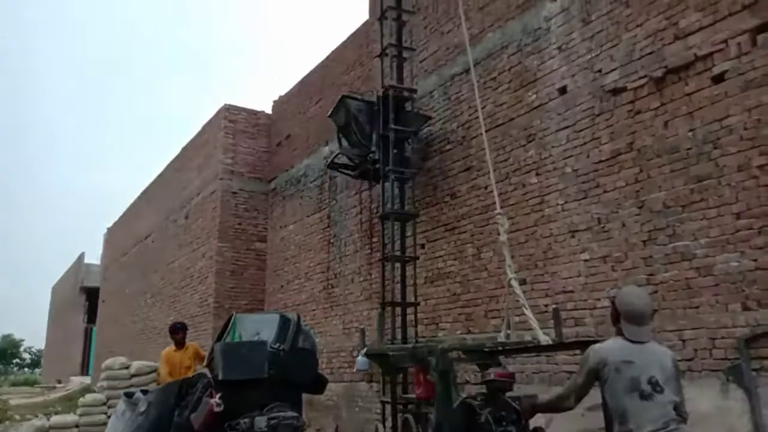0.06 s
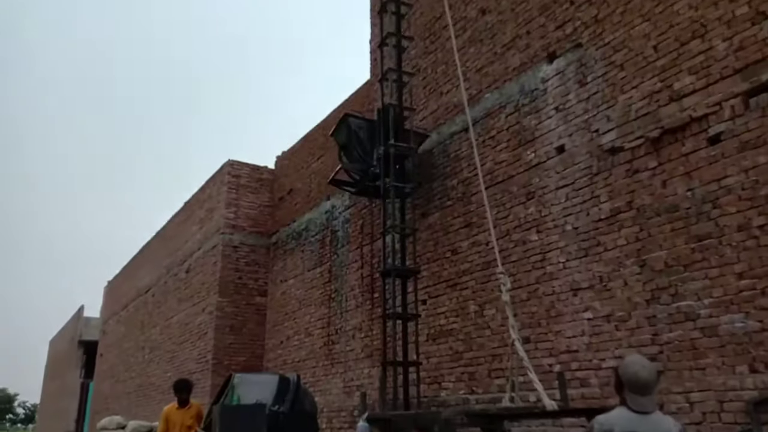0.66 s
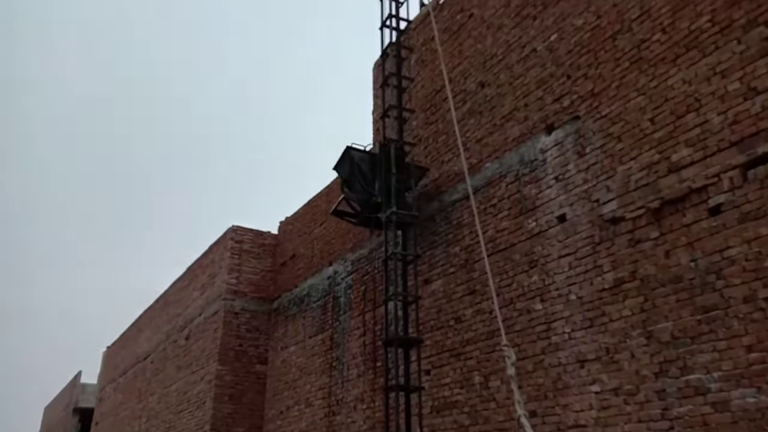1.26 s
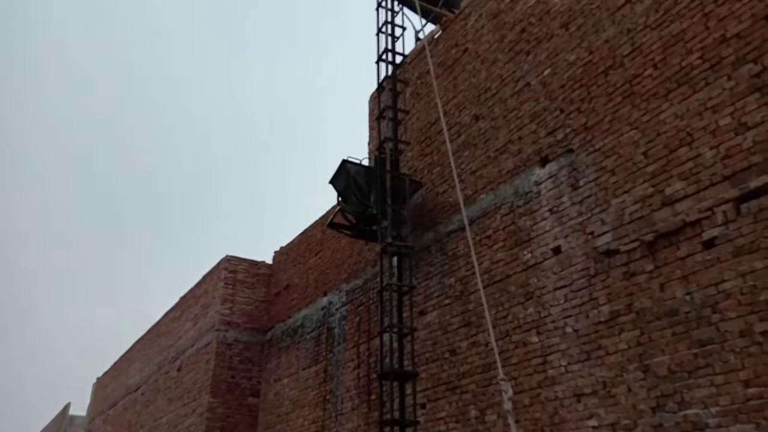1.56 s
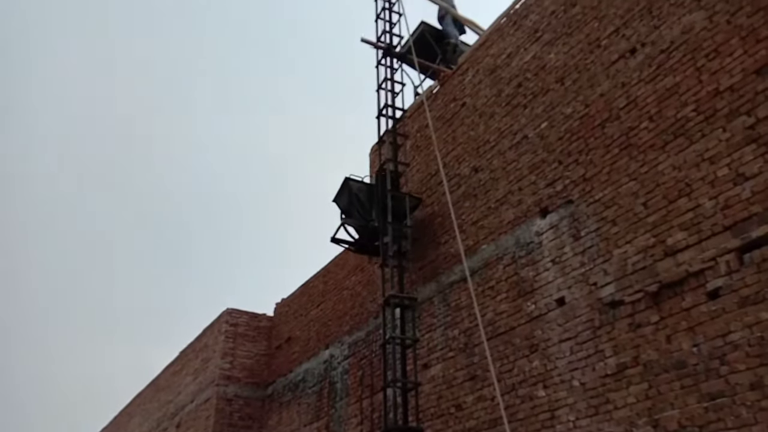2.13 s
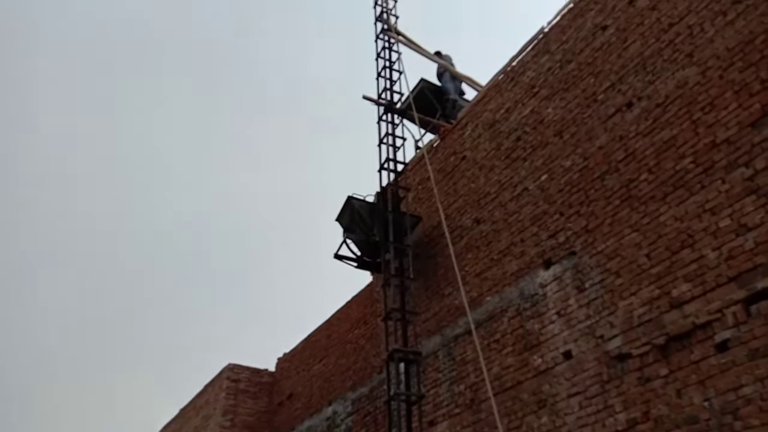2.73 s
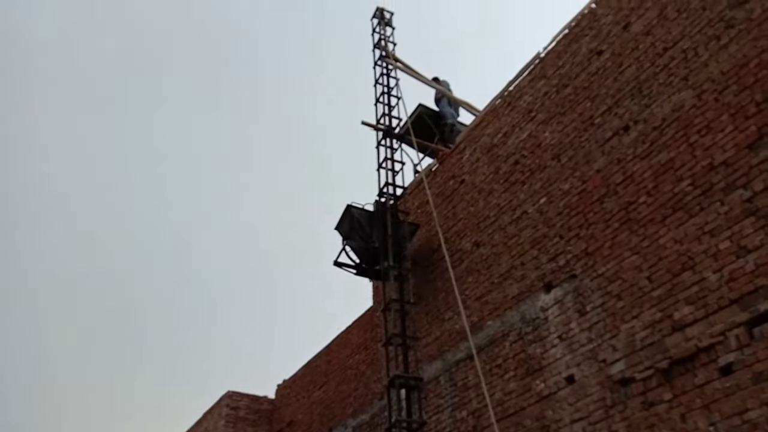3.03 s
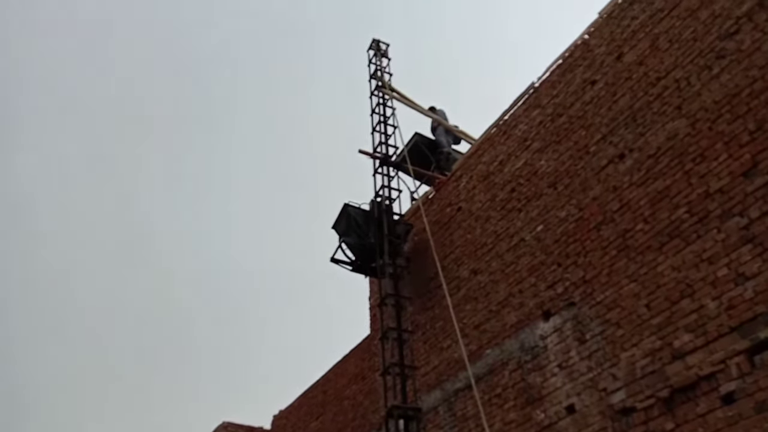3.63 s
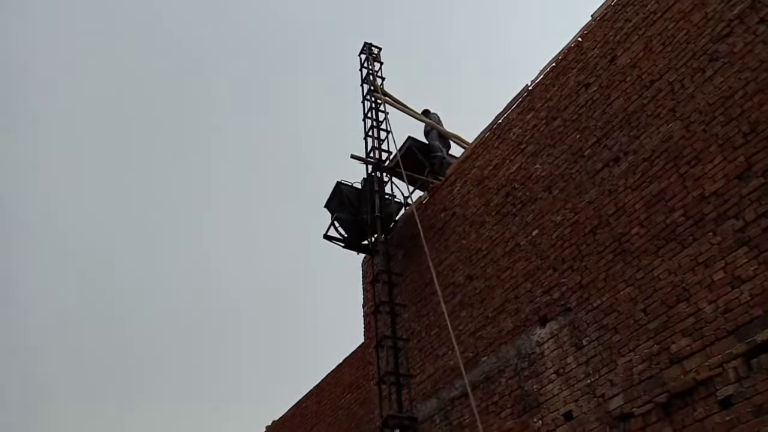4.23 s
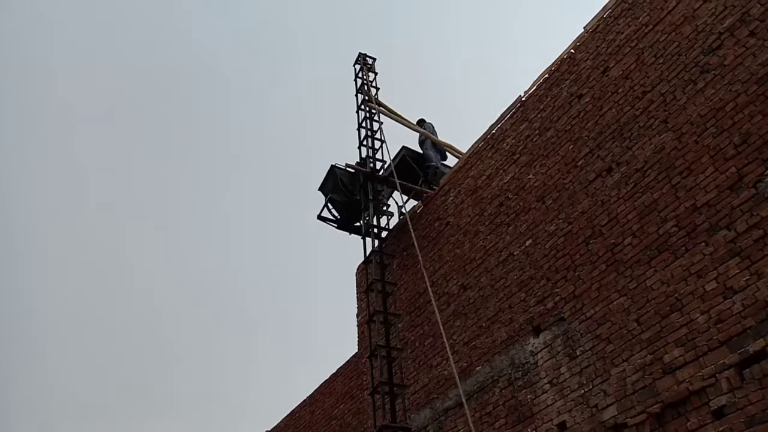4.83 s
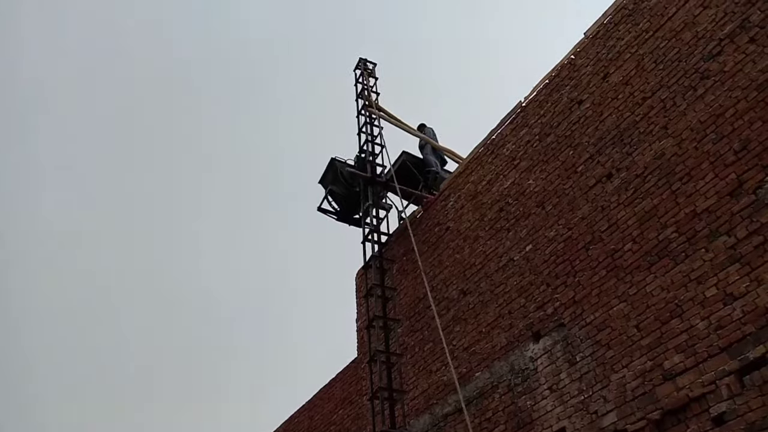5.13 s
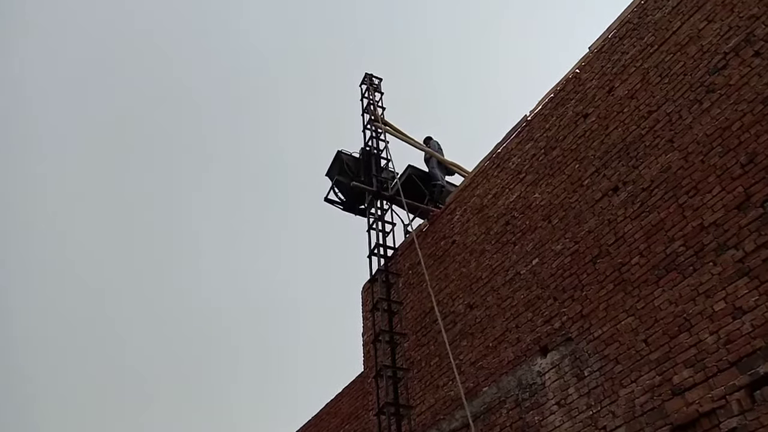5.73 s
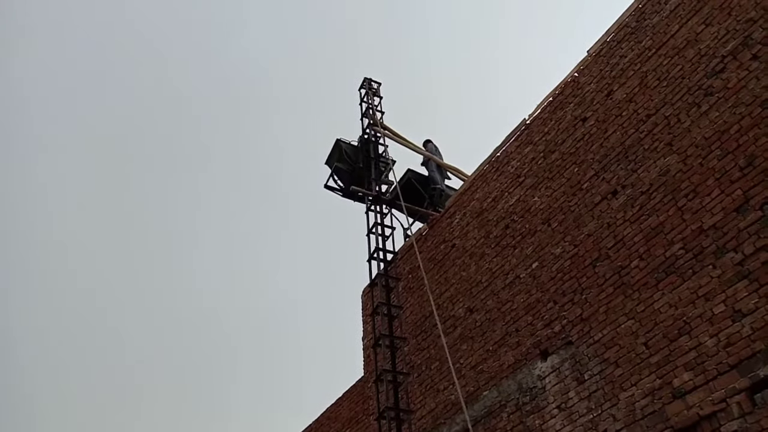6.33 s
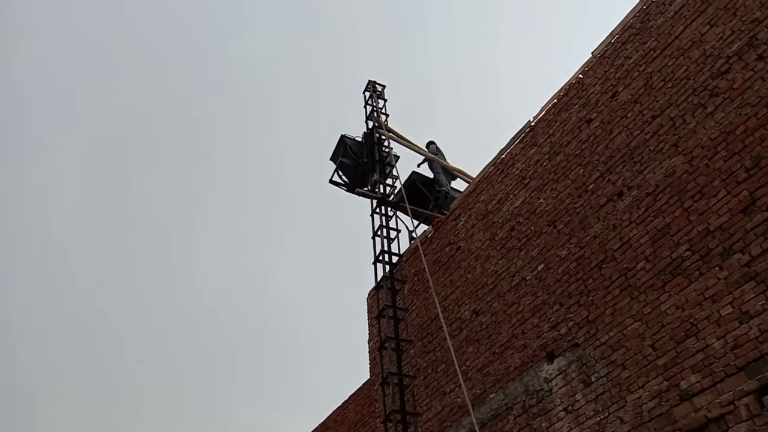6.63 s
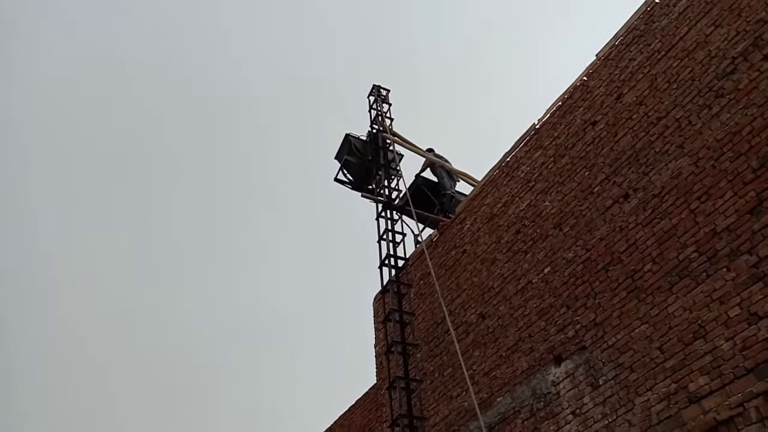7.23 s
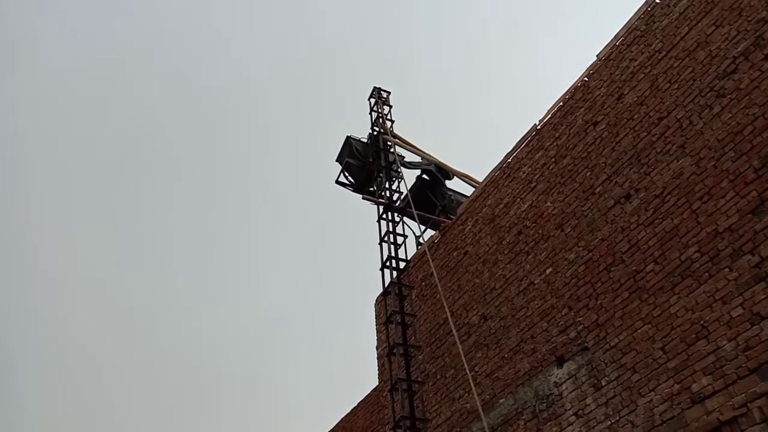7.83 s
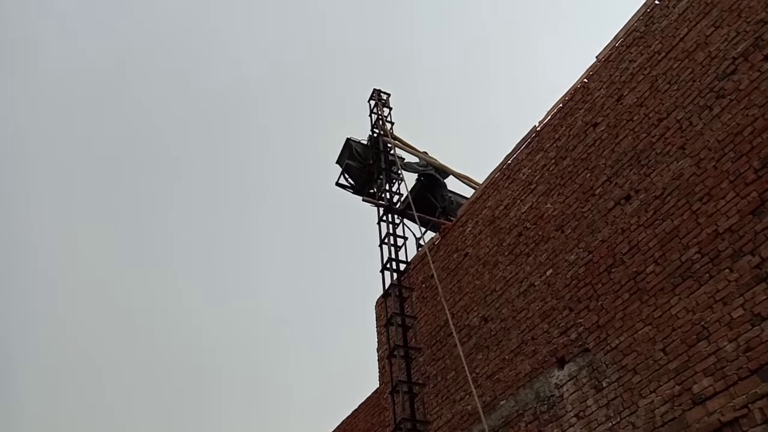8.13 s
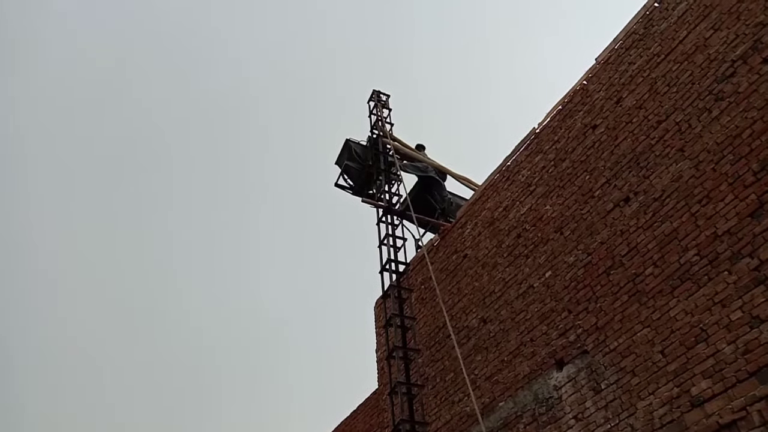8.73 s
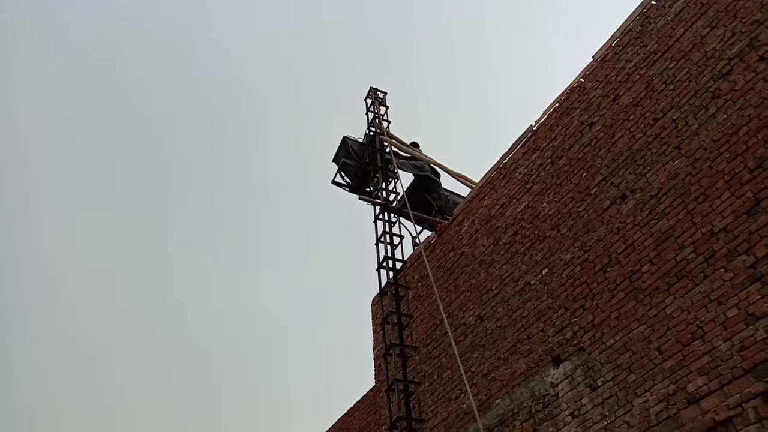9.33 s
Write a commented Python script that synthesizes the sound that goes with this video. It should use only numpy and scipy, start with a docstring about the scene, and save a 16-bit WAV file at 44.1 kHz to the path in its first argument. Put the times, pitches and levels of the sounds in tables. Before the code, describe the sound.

From the start, a single-cylinder diesel runs close to the microphone, driving a concrete mixer and hoist at an outdoor building site. It knocks hard and evenly, about thirteen beats a second, each with an exhaust puff, a ring of pipe and a metallic rattle. Over the first four seconds the knock softens slightly as the microphone tilts away. At about 5.6 seconds the throttle shuts and the sharp knock stops abruptly. The engine coasts on in booming puffs, valve clicks and gear clatter, slowing to about half speed by 8 seconds. Around 8.8 to 9.1 seconds it fires three lighter knocks at idle. A second diesel farther back, mostly buried at first, emerges after the cut with a steady, hollow chug until the end at about 9.4 seconds. The mixer drum rumbles faintly throughout, and a brick wall adds short, dull echoes.

```python
"""The hard, fast knock of a single-cylinder diesel, close up, driving a concrete mixer and hoist beside
a brick wall. Each cycle is a combustion knock, an exhaust puff that rings silencer and pipe, and a rattle
of valve gear. The microphone slowly tilts up and away. When the throttle is shut the knock stops, the
flywheel coasts down to idle and the engine fires a few times more. Farther back a second diesel chugs
steadily, over the low rumble of the drum."""
import sys
import numpy as np
from scipy import signal
from scipy.fft import rfft, irfft, next_fast_len
from scipy.io import wavfile
from scipy.ndimage import uniform_filter1d, minimum_filter1d

SR = 44100
rng = np.random.default_rng(int(sys.argv[2]) if len(sys.argv) > 2 else 0)


def pcm_store(signal):
    """Save signal as 16-bit PCM."""
    levels = np.round(np.clip(np.atleast_2d(signal), -1, 1) * 32767)
    wavfile.write(sys.argv[1], SR, levels.astype(np.int16).T)


N = 413216
TIME = np.arange(N) / SR
THROTTLE_SHUT_S = 5.58
MIC_TILT = np.minimum(TIME / 4.3, 1)  # 0 aimed at the near engine, 1 tilted up and away

# Pace of the near engine. Each row: time in seconds, cycles per second.
SPEED = [(0, 13.284), (0.8, 13.311), (1.7, 13.474), (2.6, 13.37), (3.6, 13.321), (4.5, 13.074),
         (5.5, 12.862), (6, 11.259), (6.5, 9.368), (7, 7.727), (7.5, 7.218), (8.2, 6.449), (8.7, 5.943),
         (8.95, 6.225), (9.37, 6.302)]
# Its drifting tone. Each row: time in seconds, the knock's ring in Hz, then sizzle, rattle and pipe in dB.
COLOUR = [(.45, 1460, -8, -4, 5), (1.25, 2480, 4.5, 1, 0.5), (1.8, 2070, -7, -1.5, -1.5),
          (2.5, 2480, 2, 1, -1.5), (3.7, 2520, -8.5, -0.5, 3), (4.7, 2570, -3.5, -0.5, 2),
          (5.6, 2300, -7, -1, 0)]


def near_engine():
    """The diesel at the microphone: knock, exhaust, valve and gears all follow one crank."""
    puff_place = .663  # places are fractions of a cycle
    return knock(puff_place) + exhaust(puff_place) + pipe(puff_place) + valve(puff_place) + gears(puff_place)


def knock(puff_place):
    """Fuel ignites a third of a cycle before the puff, shaking the block and thumping the crankcase."""
    # The block's spectrum. Each row: frequency in Hz, level in dB.
    block_spectrum = [(200, 13), (550, 2.5), (1000, -3.5), (1600, 4.5), (2200, 2.5), (2800, 2),
                      (3500, -5.5), (4200, -14.5), (5500, -2.5), (6900, -17.5), (8000, -27), (9800, -16),
                      (13300, -25), (15000, -15.5)]
    # Crankcase modes. Each row: delay in ms, pitch in Hz, level in dB, rise in ms, t60 in ms.
    crankcase_modes = [(0, 500, -21, 1.5, 25), (0, 766, -18, 1.2, 24)]
    # Firings at idle. Each row: start in seconds, level in dB.
    idle_firings = [(8.754, -11), (8.916, -10), (9.076, -11.5)]
    times = moments(SPEED, puff_place - .328)
    times = times[times < THROTTLE_SHUT_S]
    gains = scatter(times, spread_db=.6)
    ring_hz, sizzle_db, _, _ = curves(COLOUR)
    block = noise(block_spectrum, patchy_db=3, low_hz=442, ring_hz=ring_hz, ring_db=6.5)
    crack = highpass(block, 3300, 8)
    sizzle = highpass(block, 11000, 12)
    treble = amp(.13 * sizzle_db) * (crack - sizzle) + amp(sizzle_db) * sizzle
    blows = (block - crack) * burst(times, gains, 2.06, 6.65) + treble * burst(times, gains, 1.23, 6.4)
    shell = lowpass(highpass(block, 1400, 6), 6500, 2)
    shaking = shell * burst(times, amp(-11.5) * gains, rise_ms=13, length_ms=20.2)
    thump = chug(times, crankcase_modes, spread_db=5, detune=.08)
    idle_s, idle_db = np.transpose(idle_firings)
    idling = block * burst(idle_s, amp(idle_db), rise_ms=.9, length_ms=8)
    # Tilting up, the microphone loses 1 dB of knock and gains 1 dB of thump.
    return amp(-MIC_TILT) * (blows + shaking) + amp(MIC_TILT - 1) * thump + idling


def exhaust(puff_place):
    """Each puff strikes silencer and frame; the weak pulse of the unfired cylinder sloshes and booms."""
    # Modes of the strike and the slosh. Each row: delay in ms, pitch in Hz, level in dB, rise and t60 in ms.
    silencer_modes = [(-26.5, 92.6, -17.5, 2.6, 122), (-8, 152, -21, 7.4, 92), (-4, 289.5, -1.5, 4.1, 23.2),
                      (-3.5, 248, -20, 2, 106), (-2, 400, -14.5, 1.6, 24.7), (-1, 750, -26, 0.81, 15),
                      (-4.5, 900, -20, 1.1, 46), (-27, 240, -14, 3, 15), (10, 268, -13.5, 6.4, 34)]
    slosh_modes = [(-1, 207, 2, 2.2, 36), (-33, 137, -15, 7.3, 80), (26, 156, -8, 8.9, 170),
                   (10, 240, -15, 8.7, 73), (-8.5, 93, -5.5, 7.4, 120)]
    puffs = moments(SPEED, puff_place)
    thud = strength("exhaust") * chug(puffs, silencer_modes, spread_db=1.03, detune=.0034)
    boom = strength("boom") * chug(puffs, slosh_modes, spread_db=0, detune=.02)
    return thud + boom


def pipe(puff_place):
    """Gas pulses ring the exhaust pipe; the rushing gas keeps it singing faintly in between."""
    # The valve cracking open, the puff, its rebound. Each row: offset from the puff in cycles, level in dB.
    gas_pulses = [(-.09, -6), (0, 1), (.31, -7.5)]
    cold_hz, hot_hz = 1042, 1239 + 8 * TIME  # the note climbs as the gas heats and drops without fire
    note_hz = cold_hz + pulling() * (hot_hz - cold_hz)
    struck = 0
    for offset, db in gas_pulses:
        times = moments(SPEED, puff_place + offset)
        hz = np.interp(times, TIME, note_hz) * (1 + .0077 * rng.standard_normal(len(times)))
        struck += rings(times - .0022, amp(db - 16) * scatter(times, .8), hz, rise_ms=1.54, t60_ms=29)
    flutter = [unit(lowpass(rng.standard_normal(N), 30, 2)) for _ in range(2)]
    angle = 2 * np.pi * np.cumsum(note_hz) / SR
    singing = flutter[0] * np.cos(angle) + flutter[1] * np.sin(angle)
    _, _, _, pipe_db = curves(COLOUR)
    return amp(pipe_db) * (strength("pipe") * struck + strength("gas") * singing)


def valve(puff_place):
    """A scrape leads into the snap of the exhaust valve, which later clicks shut."""
    # The valve's spectrum. Each row: frequency in Hz, level in dB.
    valve_spectrum = [(200, 4), (550, -26), (1000, -7.5), (1600, -13), (2200, -6.5), (2800, -7),
                      (3500, -18.5), (4200, -20.5), (5500, -10), (6900, -18), (8000, -32.5), (9800, -22.5),
                      (13300, -36.5), (15000, -31)]
    puffs, seatings = moments(SPEED, puff_place), moments(SPEED, puff_place + .265)
    snap = burst(puffs - .0028, amp(-13) * scatter(puffs, .84), .47, 6.14)
    scrape = burst(puffs - .014, amp(-15) * scatter(puffs, .84), 3, 6)
    click = burst(seatings - .003, amp(-20.5) * scatter(seatings, 1.3), .73, 3.6)
    return strength("valve") * (snap + scrape + click) * noise(valve_spectrum, patchy_db=1, low_hz=233)


def gears(puff_place):
    """Tappets, gears and piston clack in step with the crank; loose parts tick at random."""
    # Clacks. Each row: offset from the puff in cycles, dB pulling, dB coasting, length in ms.
    loose_contacts = [(-.13, -15, -16, 9.8), (0.289, -16, -28, 9.4), (0.428, -13, -16, 5.5),
                      (0.554, -16.5, -19, 4.2), (.6, -38, -19.5, 22)]
    # The gears' spectrum. Each row: frequency in Hz, level in dB.
    gear_spectrum = [(200, -11.5), (550, -11.5), (1000, -5), (1600, -3.5), (2200, -1.5), (2800, -1.5),
                     (3500, -13.5), (4200, -21.5), (5500, -12.5), (6900, -26), (8000, -37.5), (9800, -28),
                     (13300, -40.5), (15000, -36)]
    contacts = [(offset, coast_db + (pull_db - coast_db) * pulling(), ms)
                for offset, pull_db, coast_db, ms in loose_contacts]
    clacks = strength("gears") * rattle(SPEED, puff_place, contacts, spread_db=.77, steady_db=-25)
    ticks = TIME[rng.random(N) < 67 / SR]  # about 67 a second
    chatter = amp(-23.5 - 4.8 * pulling()) * burst(ticks, .95, rise_ms=.26, length_ms=1.5)
    _, _, rattle_db, _ = curves(COLOUR)
    return amp(rattle_db) * np.hypot(clacks, chatter) * noise(gear_spectrum, patchy_db=2.5, low_hz=141)


def whine():
    """The frame hums and the gears whine, locked to the crank and fading when the load goes."""
    # Each row: multiple of the cycle rate, level in dB.
    crank_tones = [(7, -44), (11, -39), (23, -37), (29, -36), (67, -39), (68, -36), (84, -49)]
    angle = 2 * np.pi * np.cumsum(curves(SPEED)[0]) / SR
    tones = sum(amp(db) * np.sin(order * angle + rng.uniform(0, 2 * np.pi)) for order, db in crank_tones)
    return strength("hum") * tones


def far_engine():
    """A second diesel keeps its pace farther back; its hollow exhaust note falls within each puff."""
    # Each row: time in seconds, cycles per second.
    far_speed = [(6, 11.634), (7.8, 11.582), (9.37, 11.753)]
    # How much it stands out: buried under the knock, coming forward once the knock stops.
    # Each row: time in seconds, level in dB.
    prominence = [(0, -4.5), (4.2, -15.5), (5.5, -10.5), (5.68, -1), (9.37, 1.5)]
    # Each row: delay in ms, pitch in Hz, level in dB, rise in ms, t60 in ms.
    silencer_modes = [(-26.5, 106, -24.5, 5, 170), (-36.5, 171, -22, 3, 163), (-26, 270, -17.5, 0.94, 12),
                      (-25, 440, -16.5, 0.64, 19.4), (-5.5, 600, 1.5, 1.36, 6), (-15, 1660, -11.5, 5.3, 69)]
    # Clacks. Each row: offset from the puff in cycles, level in dB, length in ms.
    loose_contacts = [(-.17, -21, 4), (.32, -32, 3.8), (.5, -19, 3.6)]
    # The clatter's spectrum. Each row: frequency in Hz, level in dB.
    body_spectrum = [(100, 4.5), (170, 0.5), (400, -2.5), (580, -12), (1250, 1), (1700, -4), (2700, -7),
                     (3500, -21), (4300, -26.5), (5500, -18.5), (8000, -39.5), (9800, -38), (13300, -50),
                     (15000, -43)]
    puff_place = .056
    puffs = moments(far_speed, puff_place)
    thud = chug(puffs, silencer_modes, spread_db=2.3, detune=.011)
    hollow_hz = 992.5 * (1 + .014 * rng.standard_normal(len(puffs)))
    hollow = rings(puffs - .0065, amp(10) * scatter(puffs, 1), hollow_hz, rise_ms=7, t60_ms=20, sag=.29)
    clacks = rattle(far_speed, puff_place, loose_contacts, spread_db=1.5, steady_db=-22.5)
    clatter = clacks * noise(body_spectrum, patchy_db=1.5, low_hz=75.4)
    return amp(curves(prominence)[0]) * (thud + hollow + clatter)


def wall_echoes(x):
    """Brickwork and ground throw back short, dulled echoes."""
    # Each row: delay in ms, gain.
    reflections = [(6.3, 0.11), (14, 0.029), (23.4, 0.063)]
    echoes = filtered(x, lambda hz: sum(g * np.exp(-2j * np.pi * hz * ms / 1000) for ms, g in reflections))
    return lowpass(echoes, 3000, 2)


def yard(x, t60_s, dull_hz):
    """The dull, diffuse answer of the building site."""
    t = np.arange(SR // 3) / SR
    tail = rng.standard_normal(len(t)) * amp(-60 * t / t60_s) * (t > .008)
    return lowpass(signal.oaconvolve(x, tail / np.linalg.norm(tail))[:N], dull_hz, 2)


def drum():
    """The mixer drum rumbles under everything."""
    # Each row: frequency in Hz, level in dB.
    rumble_spectrum = [(25, -47), (45, -66), (70, 2), (100, -5), (200, -3.5), (350, -13), (550, -10.5),
                       (900, -9), (1500, -40), (4000, -65)]
    return amp(-32) * noise(rumble_spectrum, patchy_db=.5, low_hz=13)


def pulling():
    """1 under load, falling to 0 in 76 ms as the throttle is shut."""
    return np.clip((THROTTLE_SHUT_S - TIME) / .076 + .5, 0, 1)


def strength(part):
    """Gain of a part of the near engine, from load, speed and the aim of the microphone."""
    # Each row: dB pulling, dB coasting, dB per halving of speed, dB added at full tilt while pulling.
    part_levels = {"exhaust": (4.5, 1, -8.5, -2.5), "boom": (-39, -9.5, -5.5, -7),
                   "pipe": (6.5, 6.5, -1.5, 0.5), "gas": (-37.5, -28, -17, 5),
                   "valve": (-12.5, 0.5, 0.5, 2.5), "gears": (-1, 0, -2.5, -0.5),
                   "hum": (-0.5, -27, -15, -3)}
    pull_db, coast_db, halving_db, tilt_db = part_levels[part]
    speed, = curves(SPEED)
    load_db = pulling() * (pull_db + tilt_db * MIC_TILT) + (1 - pulling()) * coast_db
    return amp(load_db + halving_db * np.log2(speed[0] / speed))


def moments(speed, place):
    """The times at which the crank passes a place in its cycle."""
    cycles = np.cumsum(curves(speed)[0]) / SR - place
    return np.interp(np.arange(np.ceil(cycles[0]), cycles[-1]), cycles, TIME)


def chug(times, modes, spread_db, detune):
    """Every cycle rings the same modes, a little differently in strength and pitch."""
    total = 0
    for delay_ms, hz, db, rise_ms, t60_ms in modes:
        gains = amp(db) * scatter(times, spread_db)
        pitches = hz * (1 + detune * rng.standard_normal(len(times)))
        total += rings(times + delay_ms / 1000, gains, pitches, rise_ms, t60_ms)
    return total


def rings(times, gains, hz, rise_ms, t60_ms, sag=0):
    """A damped mode that swells in softly at each time, starting sharp by the fraction sag."""
    t = np.arange(SR // 9) / SR
    ms = t * 1000
    shape = (1 - np.exp(-(ms / rise_ms) ** 2)) * amp(-60 * ms / t60_ms)
    warped_s = np.cumsum(1 + sag * np.exp(-t / .006)) / SR
    notes = gains[:, None] * shape * np.sin(2 * np.pi * hz[:, None] * warped_s)
    index = np.round(times * SR).astype(int)[:, None] + np.arange(len(t))
    return np.bincount(np.maximum(index, 0).ravel(), (notes * (index >= 0)).ravel(), N)[:N]


def rattle(speed, puff_place, contacts, spread_db, steady_db):
    """Envelope of contacts tied to the crank, over the steady grinding of gears."""
    power = amp(steady_db) ** 2
    for offset, db, length_ms in contacts:
        times = moments(speed, puff_place + offset)
        times = times - .002 + .0013 * rng.standard_normal(len(times))
        power = power + (amp(db) * burst(times, scatter(times, spread_db), .81, length_ms)) ** 2
    return np.sqrt(power)


def burst(times, gains, rise_ms, length_ms):
    """Envelope of short blows: a quick rise, a moment of ringing, a fast fall."""
    ms = np.arange(SR // 20) / SR * 1000
    shape = (1 - np.exp(-(ms / rise_ms) ** 2)) * np.exp(-(ms / length_ms) ** 2)
    onsets = np.clip(np.round(times * SR).astype(int), 0, N)
    impulses = np.bincount(onsets, gains * (times > 0), N + 1)
    return signal.oaconvolve(impulses, shape)[:N]


def scatter(times, spread_db):
    """A random gain for each blow."""
    return amp(spread_db * rng.standard_normal(len(times)))


def noise(spectrum, patchy_db, low_hz, ring_hz=None, ring_db=0):
    """Noise of rms 1 with a flickering colour, thinned below low_hz, and an optional moving resonance."""
    bin_hz, frame_s, frames = signal.stft(rng.standard_normal(N), SR, nperseg=512)
    patches = uniform_filter1d(rng.standard_normal(frames.shape), size=2, axis=0)
    gain_db = patchy_db * unit(uniform_filter1d(patches, size=7, axis=1))
    if ring_hz is not None:
        gain_db += ring_db * np.exp(-((bin_hz[:, None] - np.interp(frame_s, TIME, ring_hz)) / 330) ** 2)
    patchy = signal.istft(frames * amp(gain_db), nperseg=512)[1][:N]
    knot_hz, knot_db = np.transpose(spectrum)

    def response(hz):
        db = np.interp(np.log(hz + 1), np.log(knot_hz), knot_db)
        return amp(db) * hz ** 2 / (hz ** 2 + low_hz ** 2)
    return unit(filtered(patchy, response))


def filtered(x, response):
    """x times a response of frequency."""
    size = next_fast_len(N + 8192)
    return irfft(rfft(x, size) * response(np.fft.rfftfreq(size, 1 / SR)), size)[:N]


def lowpass(x, corner_hz, order):
    """Sheds the treble above the corner."""
    return filtered(x, lambda hz: 1 / (1 + (hz / corner_hz) ** order))


def highpass(x, corner_hz, order):
    """Sheds the bass below the corner."""
    return filtered(x, lambda hz: 1 / (1 + (corner_hz / (hz + 1)) ** order))


def curves(rows):
    """Each column after the time, read at every sample."""
    seconds, *columns = np.transpose(rows)
    return [np.interp(TIME, seconds, column) for column in columns]


def amp(db):
    """Decibels to gain."""
    return 10 ** (np.asarray(db) / 20)


def unit(x):
    """x at rms 1."""
    return x / np.sqrt(np.mean(x ** 2) + 1e-20)


def limiter(x, ceiling, look_ahead_s, release_db_per_s):
    """The gain ducks just ahead of each peak and recovers at a steady rate."""
    size = int(look_ahead_s * SR) + 1
    needed_db = minimum_filter1d(-20 * np.log10(np.maximum(np.abs(x) / ceiling, 1)), 2 * size)
    recovery_db = release_db_per_s * TIME
    gain_db = np.minimum.accumulate(needed_db - recovery_db) + recovery_db
    return x * amp(uniform_filter1d(gain_db, size))


def scene():
    """At one microphone by the wall: both engines, their echoes and the drum."""
    # The silencer chamber swallows a band just above the thud.
    near = filtered(near_engine(), lambda hz: amp(-6 * np.exp(-((hz - 520) / 95) ** 2)))
    engines = near + whine() + far_engine()
    direct = engines + drum()
    return (direct + wall_echoes(engines) + amp(-17) * yard(engines, t60_s=.26, dull_hz=1020))[None]


def record(dry):
    """The recorder sheds deep bass, limits and rounds the knocks and cuts the very top."""
    thin = highpass(dry[0], 56, 4)
    held = limiter(thin, ceiling=.98, look_ahead_s=.0014, release_db_per_s=185)
    rounded = held / (1 + np.abs(held / .93) ** 6) ** (1 / 6)
    return lowpass(rounded, 15700, 120)[None]


dry = scene()
out = record(dry)
pcm_store(out)
```